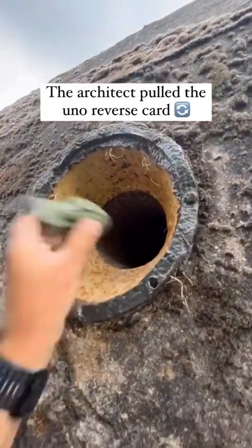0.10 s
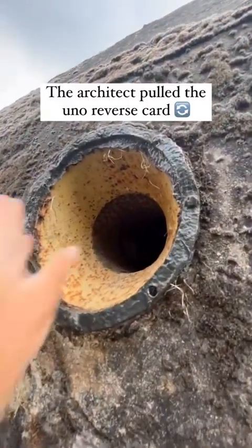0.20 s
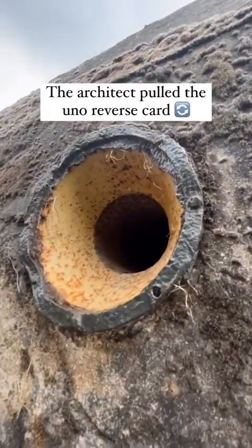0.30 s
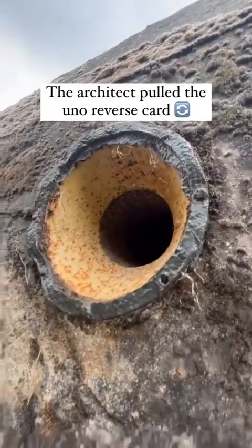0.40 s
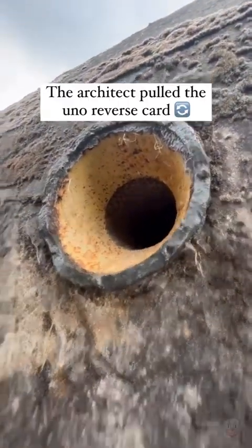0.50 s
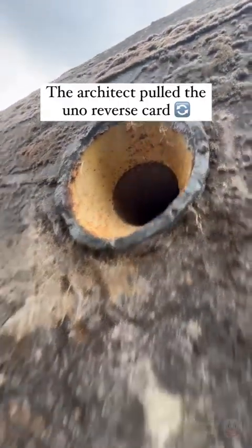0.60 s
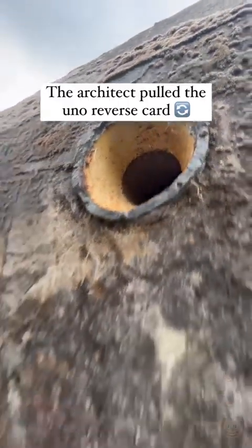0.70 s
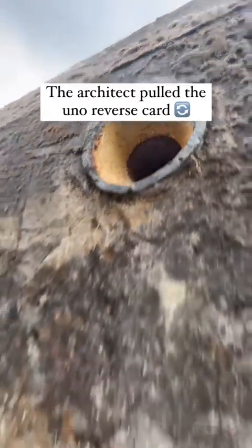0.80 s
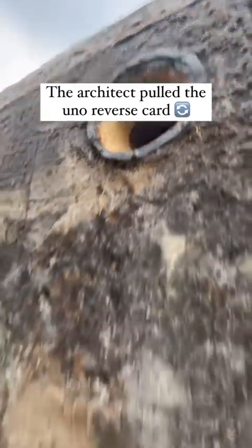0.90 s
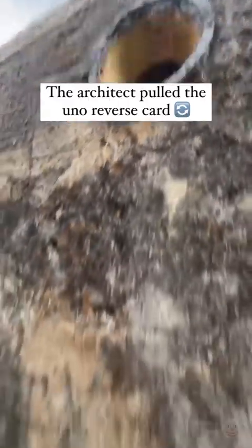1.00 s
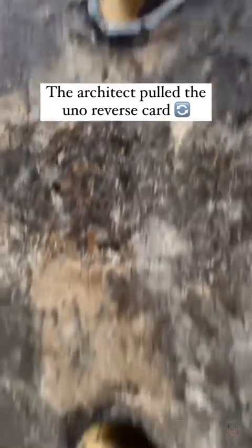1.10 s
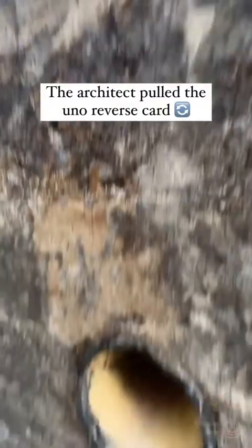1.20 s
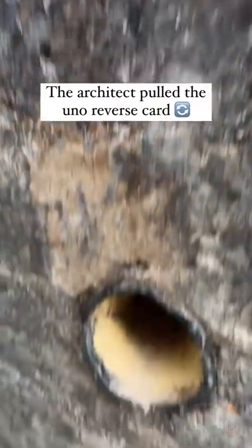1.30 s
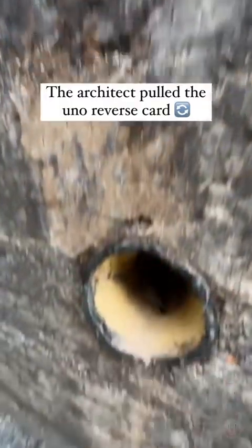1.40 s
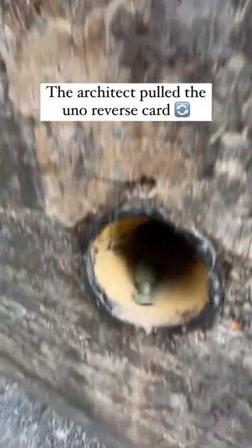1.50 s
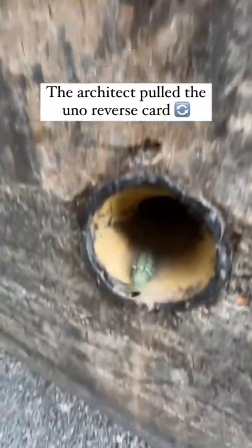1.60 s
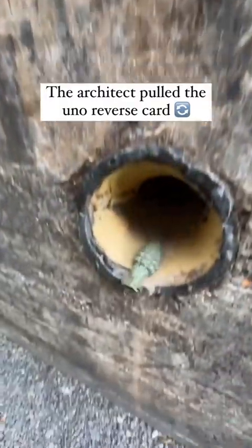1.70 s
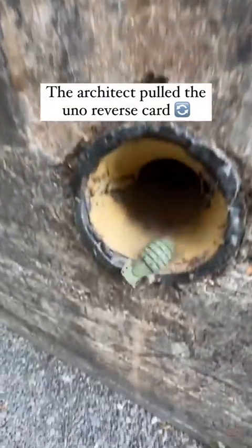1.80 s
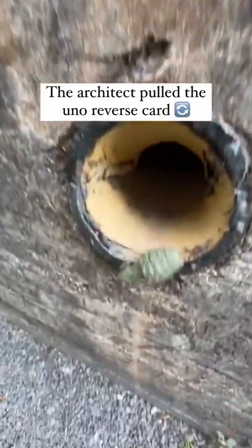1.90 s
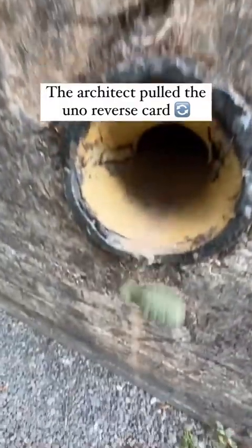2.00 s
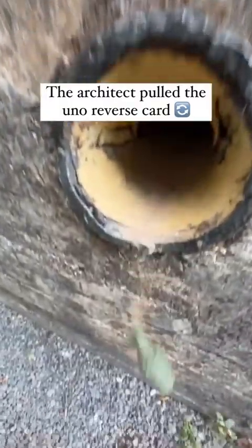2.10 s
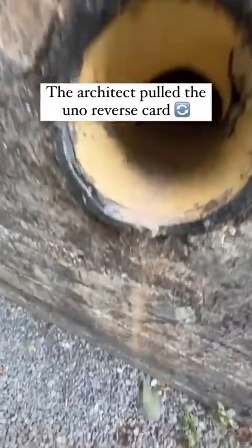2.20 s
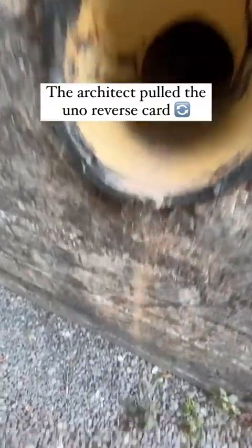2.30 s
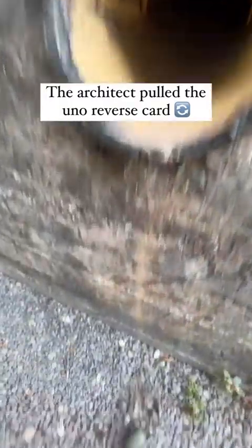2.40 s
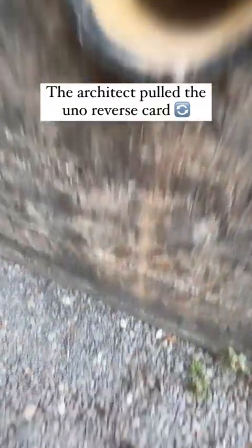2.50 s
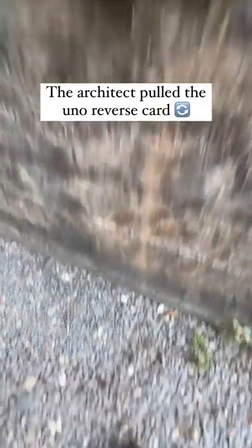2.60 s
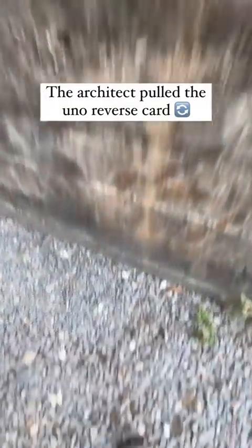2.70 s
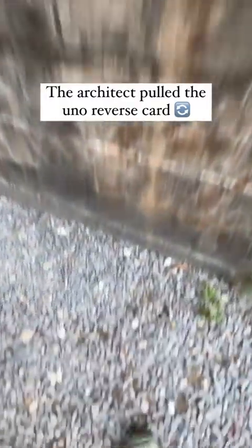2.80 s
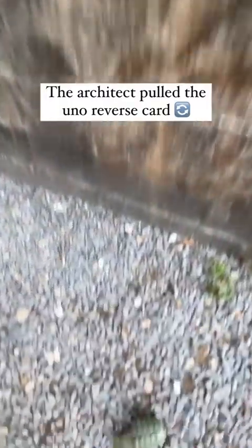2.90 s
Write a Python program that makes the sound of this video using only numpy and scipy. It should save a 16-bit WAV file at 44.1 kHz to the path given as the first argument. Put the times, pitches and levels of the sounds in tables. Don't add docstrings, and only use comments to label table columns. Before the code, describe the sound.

Heavy metal clatter in a pipe through a concrete wall: sharp bright knocks and grinding, then weaker, duller taps, a brief gap, and a hard landing on loose stones with small clinking bounces; mono, outdoors, low engine hum far below.

```python
import sys
import numpy as np
from scipy import signal
from scipy.fft import rfft, irfft
from scipy.io import wavfile

SR = 44100
rng = np.random.default_rng(int(sys.argv[2]) if len(sys.argv) > 2 else 0)


def store_pcm(level_fs):
    pcm = np.round(np.clip(level_fs, -1, 1) * 32767).astype(np.int16)
    wavfile.write(sys.argv[1], SR, np.atleast_2d(pcm).T)


def convert_level_to_amplitude(level_db):
    exponent = np.asarray(level_db, float) / 20
    return 10 ** exponent


N = 127890
CONTACT_S, RISE_S = 0.001, 0.001


def rms_one(x):
    return x / np.sqrt(np.mean(x ** 2) + 1e-20)


def in_time(rows):
    s, *columns = np.transpose(rows)
    return [np.interp(np.arange(N) / SR, s, c) for c in columns]


def flutter(per_s):
    knots = np.arange(3 * per_s + 1) / per_s
    return np.interp(np.arange(N) / SR, knots, rng.standard_normal(len(knots)))


def band_pass(x, low_hz, high_hz, order=2):
    return signal.sosfilt(signal.butter(order, [low_hz, high_hz], "band", fs=SR, output="sos"), x)


def high_pass(x, hz):
    return signal.sosfilt(signal.butter(2, hz, "high", fs=SR, output="sos"), x)


def colour(x, points):
    hz, db = np.transpose(points)
    log_hz = np.log(np.fft.rfftfreq(N, 1 / SR) + 1)
    gain = convert_level_to_amplitude(np.interp(log_hz, np.log(hz), db, left=-70, right=-70))
    return rms_one(irfft(rfft(x) * gain, N))


def ring(clicks, hz, t60):
    r, w = convert_level_to_amplitude(-60 / (t60 * SR)), 2 * np.pi * hz / SR
    return signal.lfilter([0, np.sin(w)], [1, -2 * r * np.cos(w), r * r], clicks + 1e-18)


def grit(per_s, spread_db, smooth):
    sizes = convert_level_to_amplitude(spread_db * np.minimum(rng.exponential(1, N), 4)) * rng.choice([-1, 1], N)
    grains = sizes * (rng.random(N) < per_s / SR)
    return rms_one(grains) + smooth * rng.standard_normal(N)


def bursts(rows, noise, crack_db):
    out, edges = np.zeros(N), np.geomspace(150, 15000, num=10)
    luck_db = rng.normal(0, 2.5, (len(rows), 9))
    age = np.arange(SR // 3) / SR
    rise, tail_rise = 1 - np.exp(-age / RISE_S), 1 - np.exp(-age / 0.004)
    crack = convert_level_to_amplitude(crack_db - 60 * age / 0.012)
    for k in range(9):
        shape = np.zeros(N + SR)
        for (s, db, t60, hz), chance_db in zip(rows, luck_db[:, k]):
            start = int((s + CONTACT_S) * SR)
            tail = convert_level_to_amplitude(-60 * age / max(t60, 0.01)) * tail_rise
            above_db = 3 * max(np.log2(edges[k] / hz), 0)
            shape[start:start + len(age)] += convert_level_to_amplitude(db + chance_db - above_db) * rise * (tail + crack)
        out += shape[:N] * band_pass(noise, edges[k], edges[k + 1])
    return out


def body(blows, modes, spread_db, db_per_octave, damping=0.96):
    s, db, blow_hz = np.transpose(blows)
    luck, out = rng.normal(0, 1, (len(s), len(modes))), 0
    for k, (hz, level_db, t60) in enumerate(modes):
        clicks = np.zeros(N)
        far_db = db_per_octave * np.abs(np.log2(blow_hz / hz))
        clicks[((s + CONTACT_S) * SR).astype(int)] = convert_level_to_amplitude(db + level_db + spread_db * luck[:, k] - far_db)
        out = out + ring(clicks, hz, t60 * damping)
    return out


# start_s [s], pitch_hz [Hz], level_db [dB]
ENGINE_COURSE = [(0, 62, -50), (.65, 62, -54), (.75, 66, -44), (1.2, 62, -50), (1.32, 78, -39),
                 (1.5, 72, -43), (2.1, 74, -42), (2.3, 76, -51), (2.9, 62, -46)]


def engine():
    hz, db = in_time(ENGINE_COURSE)
    turn = 2 * np.pi * np.cumsum(hz) / SR
    level = np.sqrt(2) * convert_level_to_amplitude(db + 2.5 * flutter(24))
    return level * (np.sin(turn) + convert_level_to_amplitude(-15) * np.sin(2 * turn))


# start_s [s], level_db [dB]
WIND_GUSTS = [(0, -59), (1, -46.5), (1.25, -38), (1.45, -52), (2.2, -59), (2.5, -37), (2.9, -44)]


def wind():
    return convert_level_to_amplitude(in_time(WIND_GUSTS)[0]) * rms_one(band_pass(rng.standard_normal(N), 36, 151.5, order=3))


# pitch_hz [Hz], density_db [dB per Hz]
AIR_SPECTRUM = [(90, -12), (300, -3.5), (1000, -11.5), (3000, -30), (9000, -54)]


def air():
    early_db = 16.5 * (1 - np.arange(N) / N * 0.78).clip(0)
    return convert_level_to_amplitude(-67 + early_db) * colour(rng.standard_normal(N), AIR_SPECTRUM)


# start_s [s], level_db [dB]
SLIDE_LEVEL = [(0, -79), (.13, -67), (.2, -68), (.25, -40.5), (.7, -42.5), (1.15, -46.5), (1.56, -48),
               (1.8, -63.5), (1.95, -75.5), (2.05, -99), (2.31, -99), (2.36, -38), (2.9, -63.5)]
# pitch_hz [Hz], density_db [dB per Hz]
RUST_SPECTRUM = [(120, -31.5), (300, -8), (2200, -3), (3900, -6), (6500, -4.5), (12800, -13.5),
                 (14300, -37)]


def slide():
    level = convert_level_to_amplitude(in_time(SLIDE_LEVEL)[0] + 5 * flutter(25))
    rub = level * colour(grit(900, 3.5, smooth=0.9), RUST_SPECTRUM)
    modes = sum(convert_level_to_amplitude(db) * ring(rub, hz, t60) for hz, (db, t60) in zip(SHELL_MODE_HZ, SHELL_MODES))
    return rub + convert_level_to_amplitude(-27) * modes


# start_s [s], length_s [s],
# level_db [dB], pitch_hz [Hz], width_hz [Hz]
DRAGS = [(0.7926, 0.095, -22, 4005, 610), (.778, 0.026, -20, 457, 440), (.8, 0.072, -24.5, 6170, 499),
         (1.04, 0.072, -30.5, 4050, 560), (.98, 0.032, -32, 670, 130), (1.585, .03, -30, 3460, 940),
         (2.305, 0.03, -41, 3900, 2300), (2.33, 0.08, -21.5, 6500, 790), (2.335, 0.052, -29, 680, 75),
         (.228, 0.07, -23.5, 2145, 30), (.32, .07, -30, 355, 50), (2.33, 0.083, -26, 11200, 2500),
         (2.325, 0.062, -27, 3340, 4200), (2.4, 0.084, -28.5, 10300, 1800),
         (2.482, 0.038, -25.5, 9600, 1800), (0.045, .05, -57.5, 900, 970), (.11, .055, -46, 730, 1200),
         (.09, .1, -63.5, 10000, 6000)]


def scrapes():
    out, noise = np.zeros(N), grit(2500, 2.9, smooth=0.6)
    for s, length, db, hz, width_hz in DRAGS:
        part = slice(int(s * SR), int((s + length) * SR))
        top_hz = hz + width_hz / 2
        band = band_pass(noise[part], hz ** 2 / top_hz, top_hz)
        swell = np.sin(np.pi * np.linspace(0, 1, len(band)) ** 0.7)
        out[part] += convert_level_to_amplitude(db) * rms_one(band) * swell
    return out


# start_s [s], peak_db [dB], pitch_hz [Hz], grind_db [dB], grind_t60_s [s]
UPPER_HITS = [(0.223, 2.5, 2710, -9.5, 0.049), (0.227, -4.5, 2650, -22, 0.052),
              (0.317, -11.5, 852, -34, 0.056), (0.344, -50, 1300, -72.5, 0.04),
              (0.396, -0.5, 2040, -62, 0.17), (0.4376, -0.5, 2790, -16.5, 0.067),
              (0.451, -18.5, 2400, -26, 0.033), (0.458, -9.5, 2360, -9.5, 0.068),
              (0.484, -23, 1390, -23.5, 0.065), (0.526, -5.5, 2230, -14.5, 0.12),
              (0.549, -21.5, 2320, -20, .04), (0.598, -9.5, 1960, -15.5, 0.059),
              (0.655, -34, 900, -28, .05), (0.719, -22, 1220, -34, 0.31), (0.777, -5, 1570, -8, 0.094),
              (0.794, -6.5, 2140, -13.5, 0.34), (0.898, -3.5, 2660, -14, 0.15),
              (0.976, -22, 1340, -17.5, 0.14), (1.036, -14, 1064, -14, 0.32),
              (1.049, -16, 2850, -28.5, 0.061)]
# start_s [s], peak_db [dB], pitch_hz [Hz], grind_db [dB]
LOWER_HITS = [(1.141, -20, 455, -19), (1.225, -11, 1272, -27.5), (1.279, -18.5, 1080, -53),
              (1.325, -30.5, 1500, -42), (1.359, -15.5, 1355, -22.5), (1.404, -25, 1270, -47),
              (1.414, -18, 1190, -21), (1.442, -39, 2220, -43), (1.467, -23.5, 4500, -45),
              (1.49, -33, 3300, -45), (1.501, -13, 1520, -14.5), (1.53, -18, 3500, -19),
              (1.558, -16, 3360, -31.5), (1.579, -13, 3700, -22.5), (1.631, -34, 2060, -27),
              (1.652, -20, 2090, -26.5), (1.672, -19, 2300, -40), (1.707, -31.5, 2220, -40),
              (1.734, -18, 2440, -40), (1.791, -32.5, 2190, -38), (1.832, -35, 2040, -43.5),
              (1.869, -14, 1840, -38.5), (1.891, -29.5, 1490, -45), (1.906, -25.5, 980, -42),
              (1.926, -17.5, 1043, -29), (2.108, -51, 2083, -57.5)]


def knocks():
    out, t = np.zeros(N), np.arange(SR // 5) / SR
    for hits, cycles in ((UPPER_HITS, 10.9), (LOWER_HITS, 7.5)):
        for s, db, hz, *_ in hits:
            push = convert_level_to_amplitude(-29 - 60 * t / 0.08) * rng.standard_normal(len(t))
            push[0] += 1
            soft = ring(push, hz, 1.7 / hz)
            knock = ring(soft, hz, cycles / hz)
            knock -= 0.79 * ring(soft, 0.73 * hz, 3.15 / hz)
            knock -= 0.76 * ring(soft, 1.191 * hz, 0.71 * cycles / hz)
            out[int((s + CONTACT_S) * SR):][:len(t)] += convert_level_to_amplitude(db) * knock / np.abs(knock).max()
    return out


def grind():
    rows = [(s, db + 4, t60, hz) for s, _, hz, db, t60 in UPPER_HITS]
    rows += [(s, db + 4, 0.067, hz) for s, _, hz, db in LOWER_HITS]
    return bursts(rows, colour(grit(3000, 4.4, smooth=1.0), RUST_SPECTRUM), crack_db=7)


# pitch_hz [Hz], level_db [dB], t60_s [s]
BORE_MODES = [(163, -7, 0.42), (358, -12, 0.18), (686.3, -14, 0.22), (1303, -16.5, 0.13),
              (2172, -16.5, 0.14), (2650, -17, .07), (2928, -19, 0.11)]


def bore():
    upper = body([hit[:3] for hit in UPPER_HITS], BORE_MODES, 3.2, 8)
    return upper + body([hit[:3] for hit in LOWER_HITS], BORE_MODES, 3.7, 8, damping=0.43)


# start_s [s], low_pair_db [dB], high_modes_db [dB], favoured_hz [Hz]
SHELL_STRIKES = [(0.2351, -12.5, -10, 7210), (0.318, -11.5, -5.5, 7030), (0.3442, -21, 0.5, 5900),
                 (0.398, -10.5, -3, 10500), (0.438, -16, -24, 9420), (0.4617, -13, -22, 9420),
                 (0.5285, -9.5, -6, 7780), (0.5983, -15, -10, 9240), (0.7197, -20, -7.5, 9350),
                 (0.778, -12.5, -6.5, 9170), (0.7952, -14, -6.5, 6090), (0.9016, -11.5, -6.5, 10020),
                 (0.9766, -17, -13, 9260), (1.0454, -20, -8, 7630), (1.1735, -25, -18.5, 9700),
                 (1.285, -28, -18, 7360), (1.34, -48, -21.5, 6260), (1.3742, -52, -9, 6130),
                 (1.415, -52, -25.5, 7030), (1.441, -57, -22, 6220), (1.5327, -50, -25.5, 9650),
                 (1.6534, -27.5, -22, 10730), (1.8698, -43, -39, 6250), (1.925, -44, -46, 6400),
                 (2.3357, -41, -12, 6200), (2.4006, -31, -15.5, 11050), (2.502, -35, -23.5, 6200),
                 (2.5266, -42, -7, 6320), (2.6073, -33, -13, 6240), (2.6532, -40, -18, 9130),
                 (2.8257, -33, -17.5, 6300)]
SHELL_MODE_HZ = [4680, 4755, 6260, 6480, 7030, 8010, 8065, 8950, 9420, 9475, 10165, 10890, 10965, 11542,
                 12920]
# level_db [dB], t60_s [s]
SHELL_MODES = [(-10, .5), (-10, .5), (-5, .07), (-7, .12), (-6, .12), (-8, .15), (-3, .12), (-12, .06),
               (-6, .16), (-9, .15), (-14, .08), (-6, .2), (-7, .2), (-17, .2), (-18, .3)]
# start_s [s], lower_partner_db [dB]
PAIR_FACING = [(0, 0.5), (.5, -1), (.9, 4), (1.15, -12), (1.25, -23), (1.7, -10), (2.3, -10), (2.4, -3),
               (2.9, -9)]


def shell():
    out, t, times = np.zeros(N), np.arange(N) / SR, np.array(SHELL_STRIKES)[:, 0]
    luck = rng.random((len(SHELL_STRIKES), 15, 2))
    modes = [(hz, *m) for hz, m in zip(SHELL_MODE_HZ, SHELL_MODES)]
    tumble = [convert_level_to_amplitude(3 * flutter(60)) for _ in modes]
    tumble[0] = tumble[0] * convert_level_to_amplitude(in_time(PAIR_FACING)[0])
    wander_rad = [flutter(60) for _ in modes]
    spit = high_pass(rng.standard_normal(N), 5500)
    for row, (s, low_db, high_db, spot_hz) in enumerate(SHELL_STRIKES):
        part = slice(int(s * SR), int((s + 0.36) * SR))
        age = t[part] - s
        later = (np.searchsorted(times, t[part]) - row - 1).clip(0)
        left = convert_level_to_amplitude(-10 * later) * (1 - np.exp(-age / RISE_S))
        out[part] += left * convert_level_to_amplitude(high_db - 21 - 60 * age / 0.05) * spit[part]
        for k, ((hz, mode_db, t60), (chance, phase)) in enumerate(zip(modes, luck[row])):
            off_hz = hz - spot_hz
            far_db = 13 * (1 - np.exp(-(off_hz / 317) ** 2)) + abs(off_hz) / 1000
            db = low_db if k < 2 else high_db - far_db + 10 * (chance - 0.5)
            size = convert_level_to_amplitude(db + mode_db - 60 * age / t60)
            wave = np.sin(2 * np.pi * (hz * age + phase) + wander_rad[k][part])
            out[part] += left * size * tumble[k][part] * wave
    return out


def echoes(x):
    t = np.arange(SR // 2) / SR
    tail = signal.lfilter([0.3], [1, -0.7], rng.standard_normal(len(t))) * convert_level_to_amplitude(-60 * t / 0.25)
    return convert_level_to_amplitude(-19) * signal.fftconvolve(x, tail / np.sqrt(np.sum(tail ** 2)))[:N]


# start_s [s], thud_db [dB], thud_hz [Hz], crunch_db [dB], crunch_t60_s [s]
GRAVEL_LANDINGS = [
    (2.319, -15.5, 700, -9, 0.037),
    (2.399, -14, 405, -17.5, 0.058),
    (2.448, -37, 500, -29, .03),
    (2.487, -27.5, 400, -29, 0.094),
    (2.531, -18, 262, -23, .03),
    (2.586, -41, 550, -29.5, 0.12),
    (2.608, -30.5, 390, -39, 0.054),
    (2.652, -41, 400, -33.5, 0.24),
    (2.741, -37.5, 586, -42, 0.059),
    (2.818, -54, 500, -37, 0.14),
]
# pitch_hz [Hz], level_db [dB], t60_s [s]
GROUND_MODES = [(150, 0, .13), (260, -3, .04), (390, -7, .12), (530, -4, .04), (660, -6, .07),
                (900, -1, .03)]
# pitch_hz [Hz], density_db [dB per Hz]
STONE_SPECTRUM = [(470, -4), (800, -20), (3570, -18), (6350, -7.5), (8470, -14.5), (10600, -10.5),
                  (14000, -23)]


def gravel():
    rows = [(s, db + 2.5, t60, 15000) for s, _, _, db, t60 in GRAVEL_LANDINGS]
    crunch = bursts(rows, colour(grit(1800, 2.8, smooth=0.32), STONE_SPECTRUM), crack_db=14)
    thud = body([landing[:3] for landing in GRAVEL_LANDINGS], GROUND_MODES, 1, 4)
    return crunch + convert_level_to_amplitude(3.5) * signal.lfilter(*signal.butter(2, 600, fs=SR), thud)


def scene():
    pipe = knocks() + grind() + bore()
    blows = high_pass(scrapes() + pipe + shell() + gravel(), 110)
    background = engine() + wind() + air()
    return (background + slide() + blows + echoes(blows))[None]


def roll_off(x):
    return signal.sosfilt(signal.butter(12, 14350, fs=SR, output="sos"), x)


def record(dry):
    rounded = 0.95 * np.tanh(dry / 0.95)
    cut = signal.sosfilt(signal.cheby2(10, 50, 14400, fs=SR, output="sos"), rounded)
    return roll_off(cut)


dry = scene()
out = record(dry)
store_pcm(out)
```